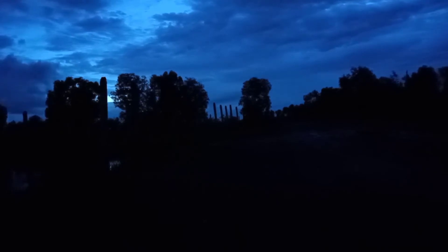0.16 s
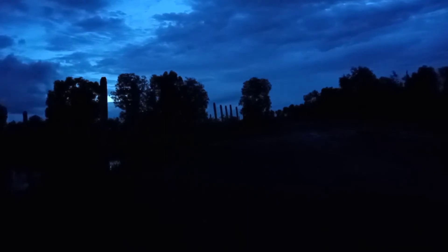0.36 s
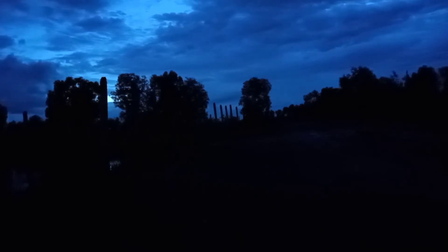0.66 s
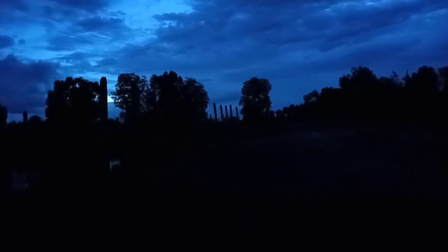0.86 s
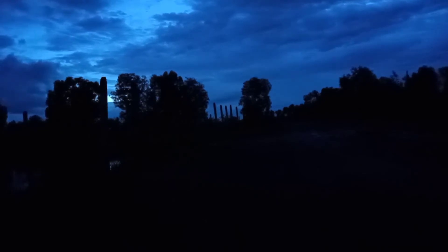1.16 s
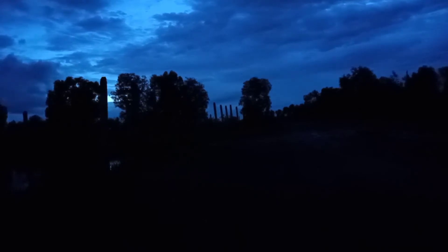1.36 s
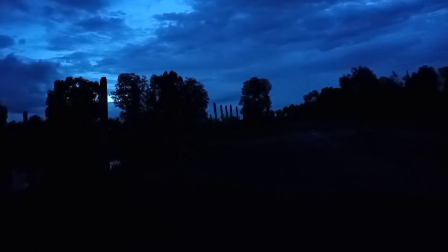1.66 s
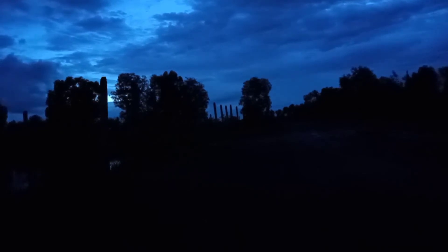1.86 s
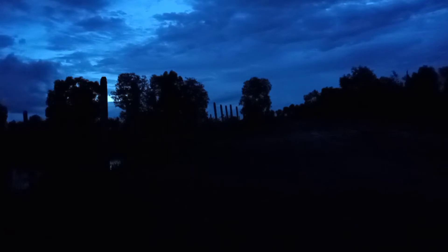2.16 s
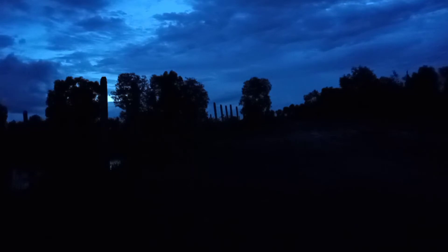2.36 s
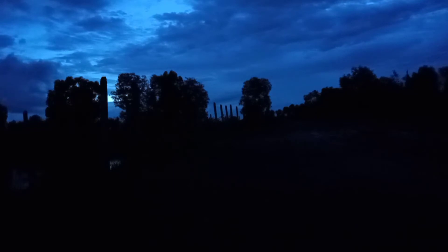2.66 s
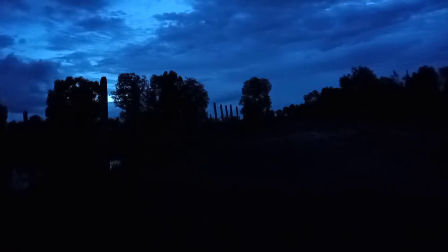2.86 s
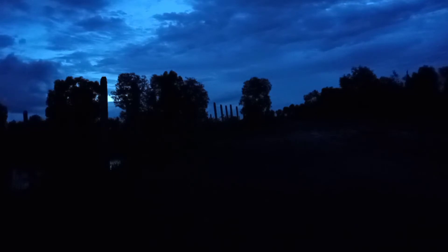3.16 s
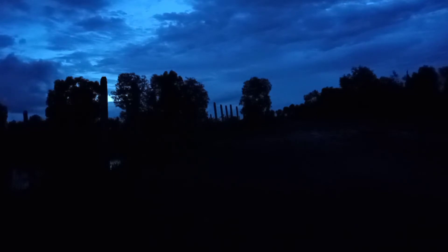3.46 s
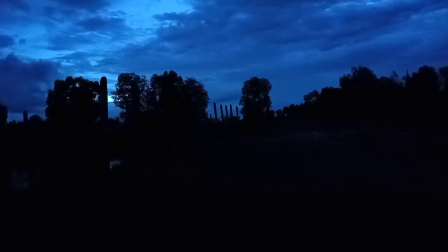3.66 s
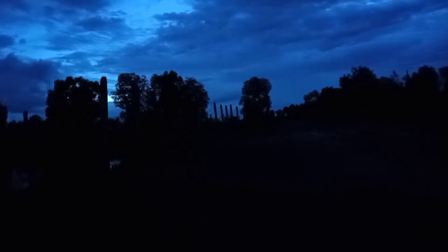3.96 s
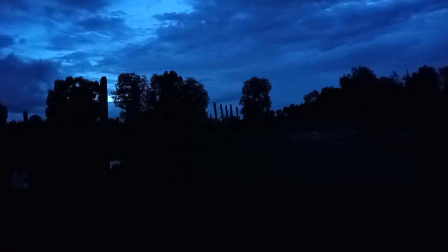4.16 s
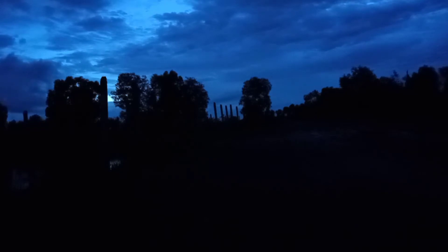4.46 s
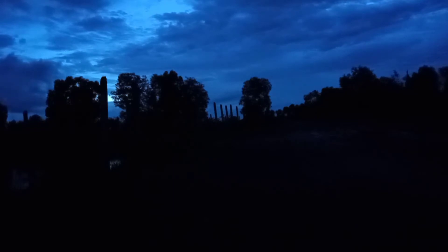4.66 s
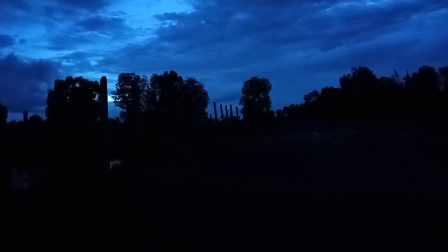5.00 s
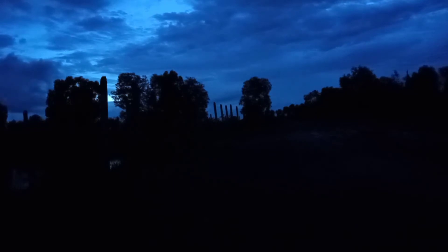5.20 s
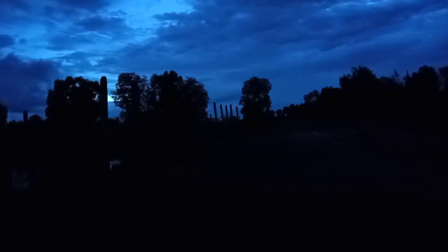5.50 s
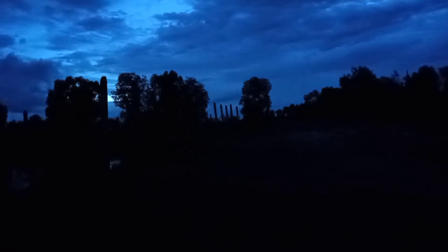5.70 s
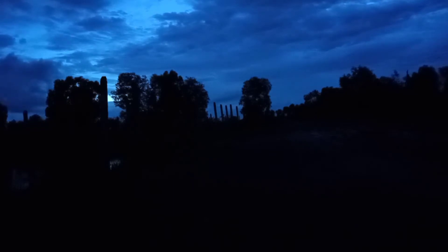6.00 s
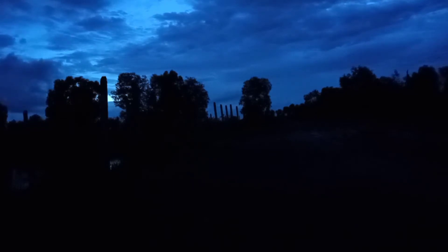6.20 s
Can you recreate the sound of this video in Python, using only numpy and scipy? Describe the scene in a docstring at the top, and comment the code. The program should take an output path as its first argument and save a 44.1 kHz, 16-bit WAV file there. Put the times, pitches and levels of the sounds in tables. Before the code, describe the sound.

Tree frogs trade short, fast-pulsed, rattling croaks over wet fields at dusk, one very close, with a distant chorus, faint dog yelps and low traffic hum.

```python
"""Tree frogs over flooded rice at dusk

One frog calls very near, four neighbours around and between its notes, a chorus far off.
Each note is a burst of larynx pulses ringing the vocal sac. A bush cricket buzzes in fading clicks, a far dog
yelps in gliding tones, a frog squawks and squeaks in the rice, soft noise bursts brush and bump close by,
and distant traffic hums under it all as shaped noise with a few faint tones."""
import sys
import numpy as np
from scipy import signal
from scipy.fft import rfft, irfft, next_fast_len
from scipy.io import wavfile
from scipy.ndimage import map_coordinates

SR = 44100
rng = np.random.default_rng(int(sys.argv[2]) if len(sys.argv) > 2 else 0)


def to_wav(s):
    """Save 16-bit WAV."""
    ch = np.atleast_2d(s).T  # columns
    pcm = np.round(np.clip(ch, -1, 1) * 32767)  # PCM
    wavfile.write(sys.argv[1], SR, pcm.astype(np.int16))


N = 279594
TOP_HZ = 15760  # upper limit of the sound

# body colour shared by the second frog and the far chorus: (frequency [Hz], relative level [dB])
MIDDLE_BODY = [(700, -40), (1250, -11.5), (1650, 10.5), (2400, 5), (3500, 3), (4200, -5.5), (6000, -16),
               (7500, -22), (15000, -33)]


def amp(db):
    """Amplitude factor of a level in dB."""
    return 10 ** (np.asarray(db) / 20)


def unit(x):
    """The sound scaled to an rms of 1."""
    return x / np.sqrt(np.mean(x ** 2) + 1e-20)


def along(points, hz):
    """Read a curve of (Hz, value) points on a log frequency axis."""
    f, v = np.transpose(points)
    return np.interp(np.log(hz + 1), np.log(f + 1), v)


def wobble(rate, size=N):
    """A smooth random curve with this many knots a second."""
    knots = rng.standard_normal(int(size * rate / SR) + 4)
    return map_coordinates(knots, [np.arange(size) * rate / SR + 1])


def filtered(x, response):
    """Shape a sound's spectrum by a response of frequency."""
    size = next_fast_len(len(x) + 8192)
    hz = np.fft.rfftfreq(size, 1 / SR)
    return irfft(rfft(x, size) * response(hz), size)[:len(x)]


def noise(spectrum, size=N):
    """Coloured noise of rms 1."""
    white = rng.standard_normal(size)
    return unit(filtered(white, lambda hz: amp(along(spectrum, hz))))


def add(track, s, sound):
    """Mix a sound into the track at time s."""
    part = track[max(round(s * SR), 0):][:len(sound)]
    part += sound[:len(part)]


def throat(body, sac_hz, width_hz, size=8192):
    """Causal response of a frog: its body colour times the sharp resonance of the vocal sac."""
    hz = np.fft.rfftfreq(size, 1 / SR)
    # keeping only the first half of the cepstrum makes the body ring after each pulse, never before
    cepstrum = irfft(np.log(amp(along(body, hz))))[:size // 2]
    colour = np.exp(rfft(2 * cepstrum, size))
    return colour / (1 + 2j * (hz - sac_hz) / width_hz)


def sagging(start_hz, dip_hz, rest_hz):
    """Start, middle and late pitch of a note: it drops to a dip, then drifts halfway to the frog's resting pitch."""
    return start_hz, dip_hz, (dip_hz + rest_hz) / 2


def note(voice, length, pitches, jitter, flick, fade_db, uneven_db):
    """Larynx pulses ring the throat; their rate sags, then flicks up as the air runs out."""
    u = np.linspace(0, 1, int(length * SR))  # position in the note
    last_third = np.clip(3 * u - 2, 0, 1)
    pitch = np.interp(u, [0, .42, .68], pitches) * (1 + flick * last_third ** 2)
    cycles = np.cumsum(pitch) / SR
    at = np.interp(np.arange(cycles[-1]), cycles, np.arange(len(u)))  # one pulse per cycle [samples]
    chance = rng.standard_normal((64, 2))[:len(at)]

    push = np.interp(at / len(u), [0, .1, .85, 1], [.95, 1, .9, .35])
    push = push * amp(uneven_db * chance[:, 0] - fade_db * at / len(u))
    drift = np.cumsum(chance[:, 1]) * jitter * SR / pitches[1]  # timing errors add up
    times = at + 8 + np.maximum(drift, -at)

    # each pulse is a windowed sinc, so it can fall between samples
    taps = np.floor(times)[:, None].astype(int) + np.arange(-8, 8)
    offset = taps - times[:, None]
    kernel = np.sinc(offset) * np.sinc(offset / 9)
    size = 2 * (len(voice) - 1)
    pulses = np.bincount((taps % size).ravel(), (push[:, None] * kernel).ravel(), size)
    sound = irfft(rfft(pulses) * voice)[:len(u) + SR // 50]  # 20 ms of ringing after the note
    return sound / np.sqrt(np.sum(sound ** 2) / len(u))


def through_rice(sound, scatter_db, t60=0.068):
    """Nearby stalks and water add a short random smear."""
    t = np.arange(SR // 25) / SR
    paths = rng.standard_normal(len(t)) * amp(-60 * t / t60)
    paths *= amp(min(scatter_db, -2)) / np.linalg.norm(paths)
    paths[0] = 1  # the direct path
    return signal.fftconvolve(sound, paths / np.linalg.norm(paths))


def outdoors(x, wet_db):
    """The direct sound plus its echo from banks and trees, a noise tail that dies sooner in the treble."""
    # echo decay: (frequency [Hz], time to fall 60 dB [s])
    echo_decay = [(300, 0.36), (3000, 0.34), (10000, 0.18)]
    hz, t, z = signal.stft(rng.standard_normal(SR // 2), SR, nperseg=256)
    z = z * amp(-60 * t / along(echo_decay, hz)[:, None])
    tail = signal.istft(z, SR, nperseg=256)[1]
    return x + amp(wet_db) * signal.fftconvolve(x, tail / np.linalg.norm(tail))[:N]


def frog(notes, voice, jitter, flick, fade_db, scatter_db, wet_db, uneven_db=1.54):
    """One frog in the field; notes are (time [s], length [s], level [dB], start, middle and late pitch [Hz])."""
    track = np.zeros(N)
    for s, length, db, *pitches in notes:
        call = note(voice, length, pitches, jitter, flick, fade_db, uneven_db)
        add(track, s, amp(db) * through_rice(call, scatter_db))
    return outdoors(track, wet_db)


def bouts():
    """Loudness of the bush cricket: each bout swells, holds and breaks off."""
    # bouts of buzzing: (start [s], end [s], level [dB])
    cricket_bouts = [(-.2, 0.35, -62), (.47, 3.32, -64.5), (5.44, 8.1, -67.5)]
    swell_s, stop_s = .06, .016
    t = np.arange(N) / SR
    loudness = np.zeros(N)
    for start, end, db in cricket_bouts:
        swell = 1 - np.exp(-np.maximum(t - start, 0) / swell_s)
        stop = np.clip((end - t) / stop_s + .5, 0, 1)
        loudness += amp(db) * swell * stop
    return loudness


def insects(click_gap, far_db, hiss_db):
    """A bush cricket makes three fading clicks per wing stroke; a farther one buzzes lower, the rest blur into a hiss."""
    # ringing of the near cricket's wing: (frequency [Hz], relative level [dB])
    wing = [(6500, -46), (7800, -13), (8400, -14), (8750, 2.5), (9000, -8.5), (9450, -6.5), (10000, -55.5)]
    # colour of the farther cricket's buzz: (frequency [Hz], relative level [dB per Hz])
    far_buzz = [(5500, -61), (6900, -12), (7200, -0.5), (7600, -10), (8800, -58.5)]
    # blurred hiss of the remaining crickets: (frequency [Hz], relative level [dB per Hz])
    far_hiss = [(7000, -42.5), (7800, -8.5), (8300, 1.5), (8750, -5), (9300, -8), (10000, -40.5)]

    stroke_hz = 44.5 * (1 + .015 * wobble(8))
    strokes = np.flatnonzero(np.diff(np.floor(np.cumsum(stroke_hz) / SR)))
    clicks = np.zeros(N + SR)
    for k, db in enumerate([0, -1.5, -9]):
        clicks[strokes + round(k * click_gap * SR)] = amp(db + 1.5 * rng.standard_normal(len(strokes)))
    t = np.arange(SR // 100) / SR
    scrape = t * np.exp(-t / .0007) * np.sin(2 * np.pi * 8850 * t)
    rasp = signal.fftconvolve(clicks, scrape)[:N]
    rasp = unit(filtered(rasp, lambda hz: amp(along(wing, hz))))
    rasp = unit(rasp + amp(-7) * noise(wing))  # grass scatters part of it into a hiss
    near = bouts() * amp(wobble(9)) * rasp

    buzz_phase = 2 * np.pi * np.cumsum(210 + 8 * wobble(8.8)) / SR
    buzz = (1 + .5 * np.sin(buzz_phase)) * noise(far_buzz)
    hiss = amp(hiss_db + 1.5 * wobble(11)) * noise(far_hiss)
    return near + amp(far_db) * buzz + hiss


def traffic(rumble_db, wander_db, rise_s, rise_db, air_db):
    """A wandering far rumble that grows towards the end, a steady rush above it and a few faint wavering tones."""
    # low rumble: (frequency [Hz], relative level [dB per Hz])
    rumble_colour = [(20, -34), (32, -23), (46, -19.5), (64, -1.5), (105, 1.5), (128, 0.5), (160, -4),
                     (210, -14.5), (320, -27), (500, -72.5)]
    # rush above it: (frequency [Hz], relative level [dB per Hz])
    rush_colour = [(100, -19.5), (220, 4.5), (310, 1.5), (450, -4), (700, -7), (1100, -17), (2000, -32),
                   (4000, -70)]
    # faint tones in the hum: (centre pitch [Hz], middle level [dB])
    hum_tones = [(102, -59.5), (441, -71), (899, -74.5)]

    tones = np.zeros(N)
    for hz, db in hum_tones:
        pitch = hz * (1 + .012 * wobble(6))
        level = amp(db + 0.83 * wobble(5.3)) * np.sqrt(2)
        tones += level * np.sin(2 * np.pi * np.cumsum(pitch) / SR)
    risen = .5 + .5 * np.tanh((np.arange(N) / SR - rise_s) / 0.18)
    rumble = amp(rumble_db + rise_db * risen + wander_db * wobble(14)) * noise(rumble_colour)
    rush = amp(air_db + 0.9 * wobble(8)) * noise(rush_colour)
    return rumble + rush + tones


def far_chorus(db, wash_db, sac_hz, count=6):
    """Far frogs each keep their own beat, smaller ones higher and quicker; the farthest blur into a wash."""
    # blur of the farthest frogs: (frequency [Hz], relative level [dB per Hz])
    wash_colour = [(300, -7), (1100, -9.5), (1700, -4), (2500, -17.5), (3300, 2.5), (3700, -1.5),
                   (4300, -10.5), (6000, -30), (10000, -29.5), (13000, -36.5), (16000, -47.5)]
    total = amp(wash_db + 1.5 * wobble(9.3)) * noise(wash_colour)
    for _ in range(count):
        smallness = np.exp(0.045 * rng.standard_normal())
        beats = np.arange(24) + rng.random() + .08 * rng.standard_normal(24)
        times = beats * .31 / smallness
        pitches = smallness * np.array([430, 390, 395])
        notes = [(s, .07, db + 3 * rng.standard_normal(), *pitches) for s in times]
        voice = throat(MIDDLE_BODY, sac_hz * smallness, width_hz=310)
        total += frog(notes, voice, jitter=0.0077, flick=.12, fade_db=10.5, scatter_db=-11, wet_db=-3.5)
    return total


def squeaks(rough, octave_db):
    """A frog's voice cracks into a short thin glide: low squeaks rise and high ones fall."""
    # squeaks: (time [s], length [s], level [dB], start pitch [Hz])
    cracks = [(0.014, 0.024, -46.5, 2445), (1.36, 0.015, -40.5, 1630), (1.379, 0.024, -38.5, 1532),
              (3.061, 0.027, -41, 1505), (4.473, 0.0099, -25.5, 1938), (4.674, .02, -41, 1635)]
    glide_hz_per_s = 18000
    track = np.zeros(N)
    for s, length, db, start in cracks:
        u = np.linspace(0, 1, int(length * SR))
        low = start < 2100
        pitch = start + (1 if low else -1) * glide_hz_per_s * u * length
        phase = 2 * np.pi * np.cumsum(pitch * (1 + rough * wobble(1200, len(u)))) / SR
        tone = np.sin(phase) + amp(octave_db) * low * np.sin(2 * phase)  # only a low squeak's octave rings the sac
        swell = np.sqrt(u * (1 - u)) * amp(1.4 * wobble(550, len(u)))
        add(track, s, amp(db) * unit(tone * swell))
    return outdoors(track, wet_db=-12)


def rustles():
    """Dry brushes and soft bumps close by: short swells of noise around one frequency."""
    # brushes and bumps: (time [s], length [s], level [dB], centre [Hz])
    brushes = [(0.029, 0.091, -46.5, 550), (2.045, .04, -63.5, 7000), (3.675, 0.031, -48.5, 434),
               (4.598, 0.12, -70, 11070), (5.439, 0.019, -49, 450)]
    track = np.zeros(N)
    for s, length, db, hz in brushes:
        size = int(length * SR)
        band = [(hz / 4, -18), (hz, 0), (hz * 1.6, -9), (hz * 3, -35), (hz * 5, -80)]
        add(track, s, amp(db) * unit(np.hanning(size) * noise(band, size)))
    return track


def deep_frog(first_s, beat_s, quicken_s, length_s, db, tiring_db, count=8):
    """A large frog calls on a nearly even beat, each note a little sooner and softer than the last."""
    # body colour: (frequency [Hz], relative level [dB])
    body = [(700, -19.5), (1200, 3), (1700, 14), (2500, 3.5), (3400, -2.5), (4200, -13.5), (5200, -24.5),
            (7000, -28), (14000, -35.5)]
    pitches = sagging(start_hz=378, dip_hz=324, rest_hz=337.9)
    notes = [(first_s + k * (beat_s - k * quicken_s), length_s, db - k * tiring_db, *pitches)
             for k in range(count)]
    voice = throat(body, sac_hz=3470, width_hz=118)
    return frog(notes, voice, jitter=0.0069, flick=0.055, fade_db=1, scatter_db=-23.5, wet_db=-4)


def squawks(sag):
    """A frog jostling with a rival: slow, uneven pulses whose rate sags by the same share in every squawk."""
    # hoarse squawks: (time [s], length [s], level [dB], start pitch [Hz])
    hoarse_calls = [(.066, .034, -38.5, 198.1), (1.33, .045, -40, 214), (3.052, 0.025, -44, 335.6),
                    (4.569, 0.02, -36, 293.4), (4.998, 0.031, -40, 236.5), (5.056, 0.016, -38, 267),
                    (6.158, 0.041, -36, 239.3)]
    # body colour: (frequency [Hz], relative level [dB])
    body = [(700, -36), (1200, -13), (1650, 12.5), (2400, 3), (3300, -4), (4300, -2.5), (5500, -11.5),
            (7500, -18.5), (14000, -52)]
    notes = [(s, length, db, hz, hz * (1 - sag), hz * (1 - sag)) for s, length, db, hz in hoarse_calls]
    voice = throat(body, sac_hz=3290, width_hz=220)
    return frog(notes, voice, jitter=0.102, flick=0.086, fade_db=2.5, scatter_db=-2.5, wet_db=-6.0)


def near_frog():
    """The nearest frog: loud, dry, even notes that end in a strong upward flick."""
    # its notes: (time [s], length [s], level [dB], dip pitch [Hz])
    near_calls = [(.199, 0.059, -15.5, 418.6), (.491, .059, -15, 437), (.781, 0.056, -15, 437),
                  (1.096, 0.055, -14.5, 453.4), (4.465, 0.011, -14.5, 492), (4.777, 0.052, -15, 400.7),
                  (5.126, 0.059, -15.6, 404.7), (5.424, .063, -15, 395.5), (5.759, .063, -15, 402.3),
                  (6.057, .056, -16, 402), (6.307, 0.047, -16, 396.5)]
    # body colour: (frequency [Hz], relative level [dB])
    body = [(600, -35), (1300, -13.5), (1750, 2.5), (2150, 3.5), (3050, 1), (3700, 1), (4200, -10.5),
            (5000, -17.5), (6700, -32.5), (7200, -13), (8500, -26), (12800, -41.5), (14900, -15),
            (15700, -27)]
    notes = [(s, length, db, *sagging(start_hz=466.6, dip_hz=dip, rest_hz=431.7))
             for s, length, db, dip in near_calls]
    voice = throat(body, sac_hz=3603, width_hz=220)
    return frog(notes, voice, jitter=.006, flick=0.36, fade_db=-1, scatter_db=-15, wet_db=-23, uneven_db=0.7)


def dog(fade_db, third_db, ring_hz, ring_width_hz, attack_db):
    """Each yelp drops to a held pitch and sinks; its overtones ring one resonance and die as the mouth closes."""
    # yelps: (time [s], length [s], base level [dB], held pitch [Hz], opening leap [share of that pitch],
    # overtone level before the resonance [dB])
    yelp_calls = [(0.215, 0.096, -51, 304, 0.044, 9), (0.722, 0.16, -40, 443, 0.31, -33),
                  (0.858, 0.064, -38, 447, 0.26, -22), (1.234, 0.077, -38.5, 445.6, 0.43, -18),
                  (1.728, 0.068, -39, 445, 0.49, -17), (2.18, .075, -39.5, 453, 0.63, -20),
                  (2.719, 0.068, -39.5, 449, 0.66, -13), (3.377, 0.0615, -40, 432, 0.684, -1),
                  (4.082, 0.043, -43.5, 435, .18, 13), (5.051, 0.051, -46.5, 432.5, 0.36, 19),
                  (6.083, 0.068, -49, 434, .35, 16)]
    drop_s = .008  # time constant of the fall from the opening leap
    sink, sink_s = 0.38, 0.014  # share of the pitch lost at the end, and its time constant
    hoot, bark = np.zeros(N), np.zeros(N)
    for s, length, db, held, leap, overtone_db in yelp_calls:
        u = np.linspace(0, 1, int(length * SR))
        burst = np.exp(-u * length / drop_s)  # the first push of air: higher, louder and rougher
        pitch = held * (1 + leap * burst - sink * np.exp((u - 1) * length / sink_s))
        roughness = (.02 + .16 * burst) * wobble(500, len(u))
        phase = 2 * np.pi * np.cumsum(pitch * (1 + roughness)) / SR
        opening = np.interp(u * length, [0, .003, .85 * length, length], [0, 1.4, 1.1, 0])
        swell = opening * amp(db + attack_db * burst + 1.5 * wobble(120, len(u)))
        overtones = np.sin(2 * phase) + amp(third_db) * np.sin(3 * phase)
        add(hoot, s, swell * np.sin(phase))
        add(bark, s, swell * amp(overtone_db - fade_db * u) * overtones)
    bark = filtered(bark, lambda hz: 1 / (1 + 2j * (hz - ring_hz) / ring_width_hz))
    return outdoors(hoot + bark, wet_db=-10.5)


def second_frog(db, length_s):
    """The near frog's nearest neighbour, with a lower sac; its notes are all equally long."""
    # its notes: (time [s], dip pitch [Hz])
    second_calls = [(1.603, 388), (1.953, 395), (2.256, 408), (2.535, 407.6), (2.843, 407.5), (4.747, 408),
                    (4.98, 406.3), (5.41, 402.6)]
    notes = [(s, length_s, db, *sagging(start_hz=448.6, dip_hz=dip, rest_hz=420.8)) for s, dip in second_calls]
    voice = throat(MIDDLE_BODY, sac_hz=3270, width_hz=240)
    return frog(notes, voice, jitter=0.0088, flick=.38, fade_db=-1, scatter_db=-14, wet_db=-9, uneven_db=1.66)


def harsh_frog(db, tail_db):
    """Each call falls and fades until the voice catches; a long one goes on after a brief pause in a lower tail."""
    # its calls: (time [s], whole length [s])
    harsh_calls = [(3.378, .068), (3.69, .077), (3.947, .086), (4.187, .03), (4.269, .07), (4.483, 0.02),
                   (4.647, 0.014), (4.874, .033)]
    # body colour: (frequency [Hz], relative level [dB])
    body = [(700, -42), (1150, -2), (1600, 15.5), (2000, 12.5), (2600, 1), (3300, 6.5), (4200, -4),
            (5000, -17.5), (7500, -9), (9500, -20), (11000, -12.5), (14000, -42.5)]
    catch_s, pause_s = .036, .005  # the voice catches this long into a call, then stays silent
    resume_s = catch_s + pause_s
    fall = sagging(start_hz=417.3, dip_hz=365, rest_hz=254.6)
    tail = sagging(start_hz=339, dip_hz=326, rest_hz=314.7)
    falls = [(s, min(length, catch_s), db, *fall) for s, length in harsh_calls]
    tails = [(s + resume_s, length - resume_s, tail_db, *tail)
             for s, length in harsh_calls if length > resume_s + pause_s]
    voice = throat(body, sac_hz=3880, width_hz=480)
    return (frog(falls, voice, jitter=.018, flick=.02, fade_db=2, scatter_db=-11.5, wet_db=-6.5)
            + frog(tails, voice, jitter=0.018, flick=.04, fade_db=-0.5, scatter_db=-13, wet_db=-8))


def answering_frog(db):
    """A farther frog puts long, echoing notes into the near one's pauses."""
    # its notes: (time [s], length [s], dip pitch [Hz])
    answers = [(4.555, .039, 347.4), (4.951, 0.087, 379), (5.226, .08, 349.8), (5.604, .08, 357),
               (5.957, 0.084, 364.3)]
    # body colour: (frequency [Hz], relative level [dB])
    body = [(700, -40.5), (1200, -1.5), (1650, 6.5), (2200, 8), (3000, -8), (4200, -2), (5000, -13),
            (7500, -18), (9500, -34), (11000, -14), (14000, -46)]
    notes = [(s, length, db, *sagging(start_hz=400, dip_hz=dip, rest_hz=342.6)) for s, length, dip in answers]
    voice = throat(body, sac_hz=3543, width_hz=176)
    return frog(notes, voice, jitter=0.015, flick=0.076, fade_db=-3, scatter_db=-14.5, wet_db=-3.5)


def scene():
    """Frogs near and far over the other sounds of the evening."""
    crickets = insects(click_gap=.0058, far_db=-78.5, hiss_db=-71.5)
    hum = traffic(rumble_db=-47.5, wander_db=2.5, rise_s=5, rise_db=2.5, air_db=-56.5)
    frogs = far_chorus(db=-60.5, wash_db=-56.5, sac_hz=3320)
    frogs += squeaks(rough=.04, octave_db=-2.0)
    frogs += deep_frog(first_s=.047, beat_s=.296, quicken_s=0.0011, length_s=.071, db=-43.0, tiring_db=0.34)
    frogs += squawks(sag=.13)
    frogs += near_frog()
    frogs += second_frog(db=-33, length_s=.063)
    frogs += harsh_frog(db=-38.0, tail_db=-40)
    frogs += answering_frog(db=-36.0)
    yelps = dog(fade_db=21, third_db=-5.5, ring_hz=847, ring_width_hz=178, attack_db=0.5)
    return (frogs + yelps + crickets + rustles() + hum)[None]


def record(dry):
    """Nothing passes above the band limit; a 2 ms ramp ends the sound without a click."""
    ending = np.minimum(np.arange(N)[::-1] / (.002 * SR), 1)
    return filtered(dry[0] * ending, lambda hz: hz < TOP_HZ)[None]


dry = scene()
out = record(dry)
to_wav(out)
```